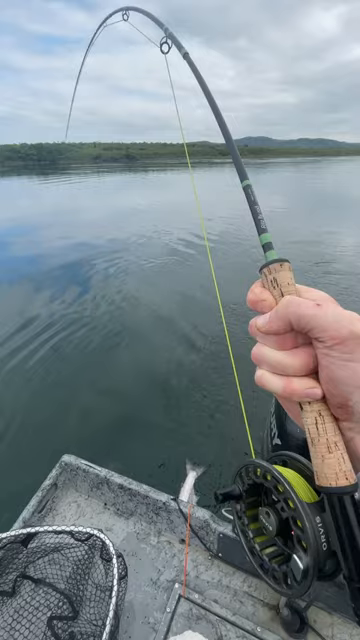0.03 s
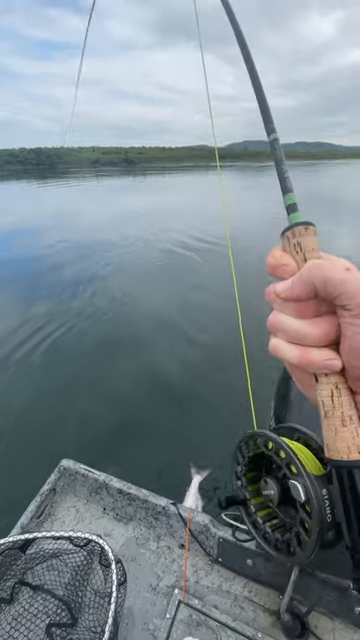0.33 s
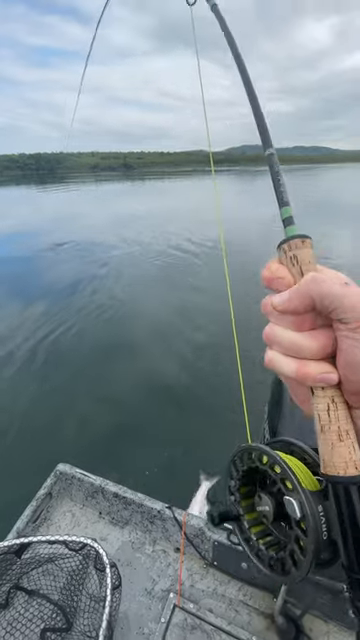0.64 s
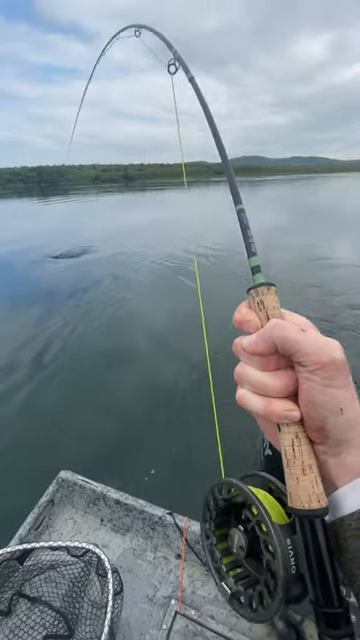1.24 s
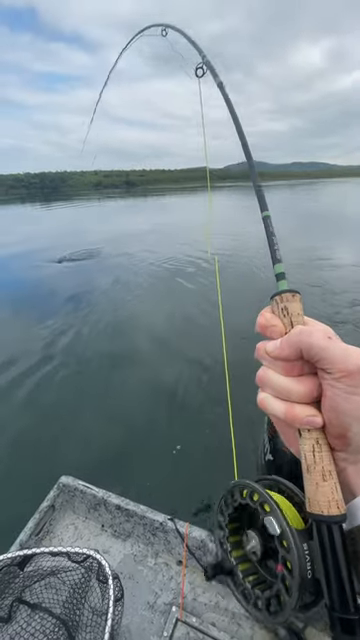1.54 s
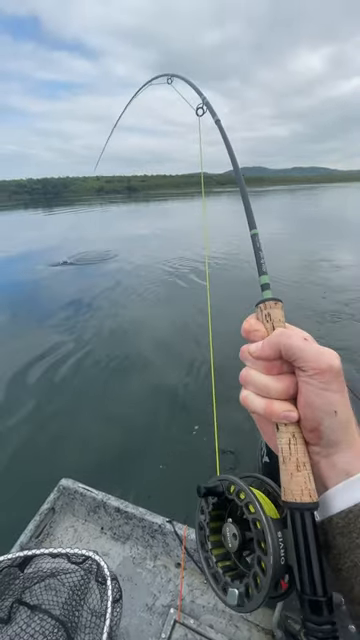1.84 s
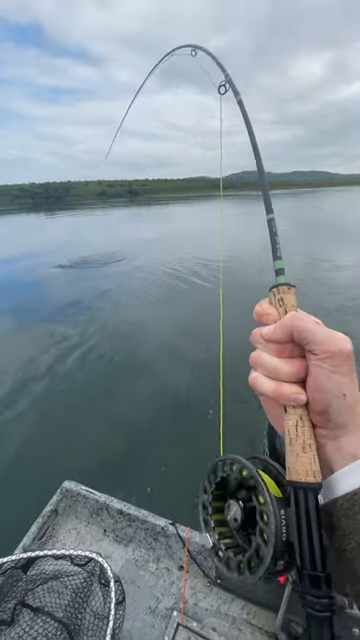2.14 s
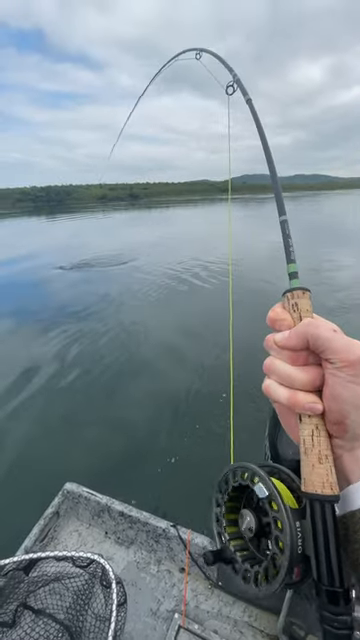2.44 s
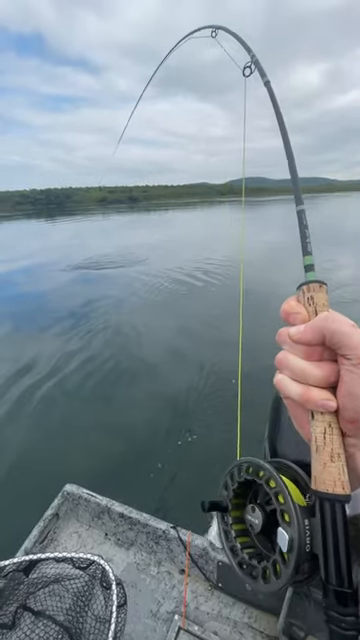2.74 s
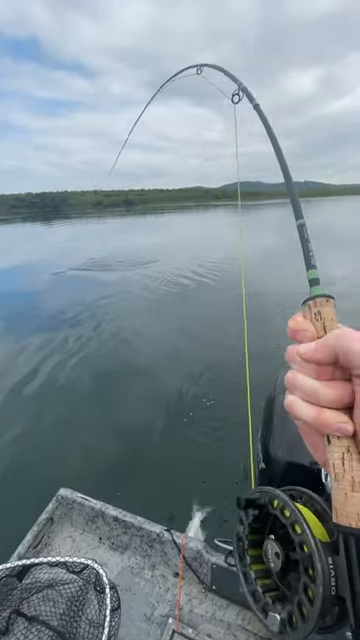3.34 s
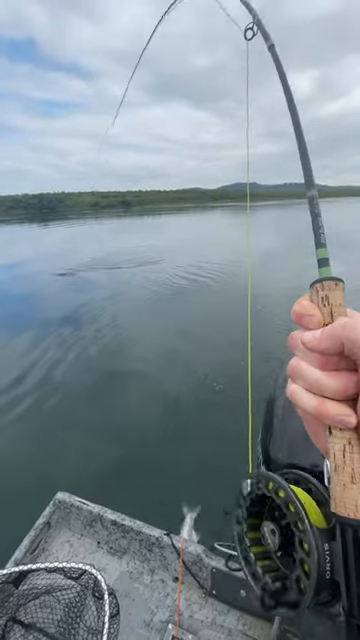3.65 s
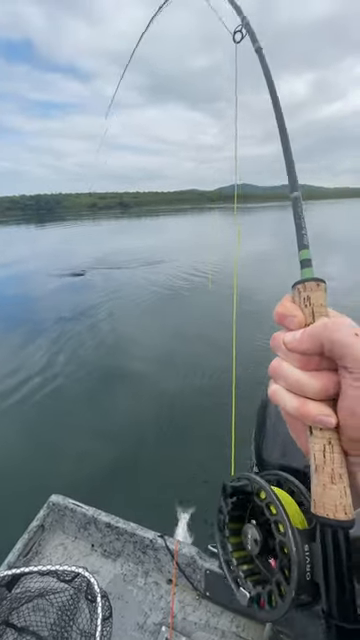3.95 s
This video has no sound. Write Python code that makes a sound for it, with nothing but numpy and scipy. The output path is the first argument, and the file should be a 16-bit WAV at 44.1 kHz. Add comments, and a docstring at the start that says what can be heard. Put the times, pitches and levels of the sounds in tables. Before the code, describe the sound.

A fly reel close by buzzes in four short surges as a fish pulls line, with slow single clicks between them. Behind it, water laps and plops softly at the boat's hull over a faint low hum.

```python
"""A fly reel gives line to a hooked fish in four surges, close by in a boat on a calm lake.
Its pawl snaps over the spool's 22 teeth: single ticks at a creep, a buzz on the run, the ring
changing colour round each turn. Spool and line whirr with the speed; the boat adds short echoes.
Behind it, ripples lap and bubbles plop at the hull over a low hum, probably an electric motor."""
import sys
import numpy as np
from scipy import signal
from scipy.fft import rfft, irfft
from scipy.io import wavfile
from scipy.ndimage import uniform_filter1d

SR = 44100
rng = np.random.default_rng(int(sys.argv[2]) if len(sys.argv) > 2 else 0)


def wrap_up_sound(samples):
    """Save the sound to the file named by the first command line argument, as 16-bit audio."""
    columns = np.atleast_2d(samples).T
    # keep every value between -1 and 1, then stretch to whole-number steps
    tamed = np.clip(columns, -1, 1)
    steps = np.round(tamed * 32767).astype(np.int16)
    wavfile.write(sys.argv[1], SR, steps)


N = 176400
TIME = np.arange(N) / SR

# fader ride of the hum: t/s, level/dB
HUM_RIDE = [(.05, -48), (.16, -58.5), (.25, -67), (.3, -54), (.43, -48.5), (.63, -54), (.85, -43.5),
            (1.6, -38.5), (2.07, -47), (2.5, -43.5), (2.68, -49), (2.82, -44), (3.03, -52.5), (3.38, -45.5),
            (3.57, -59.5), (3.74, -59.5), (4, -47.5)]
# fader rides of the lapping: t/s, splash level/dB, gurgle level/dB
LAPPING_RIDE = [(0, -52.5, -65.5), (.3, -69.5, -84), (.7, -73.5, -78.5), (1.05, -62.5, -72.5),
                (1.45, -60.5, -67), (1.9, -58, -56.5), (2.2, -59.5, -72.5), (2.45, -66, -75.5),
                (2.7, -67, -76), (2.88, -72, -60.5), (3.1, -68.5, -74), (3.4, -59.5, -73),
                (3.6, -63.5, -70), (3.78, -68.5, -60), (4, -64, -62)]
# EQ curves of the water's bright splash, hollow gurgle and low rumble: f/Hz, relative level/dB
SPLASH_EQ = [(200, -36), (600, -6.5), (1000, -3), (2000, -2), (3300, -12), (5500, -11.5), (12000, -25.5),
             (16000, -40)]
GURGLE_EQ = [(100, -4.5), (400, 9.5), (600, -0.5), (1000, 2.5), (3000, -45)]
RUMBLE_EQ = [(20, -20.5), (55, 3.5), (160, -3), (300, -16.5), (1000, -71)]
# plops at the hull: t/s, relative level/dB, f/Hz
PLOP_CUES = [(0.036, -45, 868), (0.294, -50, 2200), (0.343, -48.5, 647), (0.373, -49.5, 1500),
             (0.392, -50.5, 1220), (0.441, -55, 985), (0.456, -62, 2500), (0.513, -61.5, 1720),
             (0.695, -50, 2030), (0.77, -55, 560), (0.912, -56.5, 585), (0.927, -54.5, 1514),
             (0.997, -45, 1453), (1.25, -46, 946), (1.431, -40.5, 1950), (1.525, -44.5, 1975),
             (1.639, -45, 2120), (1.667, -44.5, 1910), (1.812, -40, 2055), (2.235, -48, 1076),
             (2.298, -44, 1006), (2.536, -49, 650), (2.536, -53, 1460), (2.572, -44.5, 895),
             (2.606, -57, 1063), (2.656, -49, 844), (2.66, -55, 1480), (2.922, -53.5, 1146),
             (3.144, -50.5, 897), (3.434, -43, 418), (3.666, -46, 1068), (3.711, -43.5, 1566),
             (3.745, -51, 1050), (3.786, -51, 1080), (3.905, -50, 852)]
# small sharp slaps of water: t/s, level/dB, centre f/Hz
SLAP_CUES = [(0.472, -62, 7200), (0.692, -64, 4770), (0.798, -56, 4870), (2.292, -33, 2260),
             (3.192, -42, 4300)]
# EQ curve of the spool and running line: f/Hz, relative level/dB
WHIRR_EQ = [(200, -30), (1000, -14), (1600, 6.5), (2400, 5), (5500, 5), (8000, -7.5), (12000, -5.5),
            (16000, -59)]
# spool speed, one list for each surge: t/s, speed/(teeth/s)
SURGE_SPEEDS = [
    [(0.0377, 80.7), (0.0925, 102.2), (0.1138, 98.2), (0.1361, 103.4), (0.1606, 96.1), (0.1848, 83.4),
     (0.2578, 28.2)],
    [(1.2177, 31.6), (1.2422, 44.0), (1.33, 47.5), (1.3709, 55.6), (1.4112, 54.2), (1.4902, 24.6),
     (1.5149, 33.7)],
    [(1.7788, 37.8), (1.8293, 49.5), (1.8723, 80.7), (1.9525, 114.5), (1.9983, 112.4), (2.0557, 93.6),
     (2.0956, 82.3), (2.1459, 53.4), (2.28, 24.3)],
    [(3.2919, 56.3), (3.3392, 126.2), (3.3797, 174.8), (3.4884, 208.5), (3.5333, 219.9), (3.5999, 164.1),
     (3.6175, 152.2), (3.6474, 131.0), (3.6782, 92.5), (3.7307, 20.0)],
]
# accent on the ticks of each surge: relative level/dB
SURGE_ACCENTS = [0, 1, 1.2, 1.5]
# single ticks while the spool creeps: t/s, relative level/dB
CREEP_CUES = [(.9106, 2), (.9884, 2), (1.035, 0.5), (1.0768, -1), (1.1118, -0.5), (1.145, 2), (1.1824, 1),
              (1.562, 3), (1.6609, 3), (1.7189, 4.5), (1.7512, 3.5), (2.3179, -1), (2.3676, 0),
              (2.4308, 0.5), (2.4998, 2.5), (2.5882, 2.5), (2.7078, -1), (3.1675, 1), (3.2081, 2.5),
              (3.269, 2.5)]
# resonances of the reel: f/Hz, width/Hz, relative level/dB, level swing/dB, loudest tooth/index,
# swings/(1/turn), pitch swing/Hz
REEL_MODES = [(2500, 1660, -20.5, 2, 8.7, 1, -280), (3830, 790, -11.5, 2, 3.7, 3, 45),
              (5167, 370, -19, 15, 1.25, 1, 87), (6200, 450, -1.5, 1.5, 6.8, 1, 275),
              (6470, 1560, -8.5, 2.5, 18.4, 2, 287), (8390, 750, -7.5, 2.5, 3.7, 2, -180),
              (9340, 3600, -17.5, 4.5, 14.4, 3, 448), (13240, 2000, -23, 7, 21, 1, -190),
              (15260, 700, -16.5, 5, 2.1, 1, 200)]
# stereo image of the reel: f/Hz, phase lead of left over right/rad
REEL_PHASE_LEAD = [(200, 4), (1500, 2.4), (3500, 2.5), (5200, 1), (7000, 4), (9000, 4), (11000, 6),
                   (14300, 10)]

TEETH = 22
BUBBLE_CYCLES = 10  # a bubble's ring falls to 1/e in this many cycles


def amp(db):
    """Decibels to gain."""
    return 10 ** (np.asarray(db) / 20)


def unit_rms(x):
    """Scales to rms 1."""
    return x / np.sqrt(np.mean(x ** 2) + 1e-20)


def ride(rows, column=1):
    """A fader ride: one column of a table, joined by straight lines in time."""
    rows = np.array(rows)
    return np.interp(TIME, rows[:, 0], rows[:, column])


def add(mix, start_s, sound):
    """Drops a sound into the mix at its cue."""
    part = mix[..., max(round(start_s * SR), 0):][..., :sound.shape[-1]]
    part += sound[..., :part.shape[-1]]


def noise(eq, correlation):
    """Stereo noise of rms 1 through an EQ curve; low correlation makes it wide."""
    hz, db = np.transpose(eq)
    left, other = rng.standard_normal((2, N))
    right = correlation * left + np.sqrt(1 - correlation ** 2) * other
    colour = amp(np.interp(np.log(np.fft.rfftfreq(N, 1 / SR) + 1), np.log(hz), db))
    return unit_rms(irfft(rfft([left, right]) * colour, N))


def drift(hz):
    """A random modulator of rms 1, rolled off above hz."""
    lowpass = np.exp(-(np.fft.rfftfreq(N, 1 / SR) / hz) ** 2)
    return unit_rms(irfft(rfft(rng.standard_normal(N)) * lowpass, N))


def hum(hz=110.45, waver=0.0034, octave_db=-22, left_lag_rad=0.076):
    """The low bed, probably an electric motor: a slightly wavering note with a weak octave."""
    pitch = hz * (1 + waver * drift(hz=6.3))
    phase = 2 * np.pi * np.cumsum(pitch) / SR - np.array([[left_lag_rad], [0]])
    octave = amp(octave_db + 2 * drift(hz=10)) * np.sin(2 * phase)
    return amp(ride(HUM_RIDE)) * (np.sin(phase) + octave)


def lapping(ripple_db=2.2, spatter_db=3.5, correlation=0.057):
    """Ripples wash the hull: an uneven, spattering splash over a gurgle and a steady rumble."""
    splash = noise(SPLASH_EQ, correlation)
    splash *= amp(ride(LAPPING_RIDE) + ripple_db * drift(hz=43) + spatter_db * (drift(hz=398) - 0.5))
    gurgle = noise(GURGLE_EQ, correlation) * amp(ride(LAPPING_RIDE, column=2) + 2.7 * drift(hz=9.7))
    rumble = amp(-67.5) * noise(RUMBLE_EQ, correlation=0.38)
    return splash + gurgle + rumble


def bubble(db, hz, pinch_cycles=3, pinch_drop=.35, rise=.04):
    """A bubble pinches off with a quick drop in pitch, then rings and rises slowly; panned at random."""
    decay_s, pinch_s = BUBBLE_CYCLES / hz, pinch_cycles / hz
    t = TIME[:int(6 * decay_s * SR)]
    pan, lag = rng.standard_normal(2)
    sides = np.array([[1], [-1]])
    pinch = np.exp(-t / pinch_s)
    pitch = hz * (1 + pinch_drop * pinch + rise * (t / decay_s - 1))
    phase = 2 * np.pi * np.cumsum(pitch) / SR + .5 * lag * sides
    envelope = (1 - pinch) * np.exp(-t / decay_s)
    return amp(db + 1.1 * pan * sides) * envelope * np.sin(phase)


def small_bubbles(per_s=90, centre_hz=1442.4, spread_octaves=.5, boost_db=7, spread_db=3.5):
    """Clusters of small bubbles, their level riding with the splash."""
    out, level_db = np.zeros((2, N)), ride(LAPPING_RIDE) + boost_db
    starts = np.flatnonzero(rng.random(N) < per_s / SR * np.exp(drift(hz=8)))
    variations = np.clip(rng.standard_normal((N // 100, 2)), -2, 2)
    for i, (strength, pitch) in zip(starts, variations):
        hz = centre_hz * 2 ** (spread_octaves * pitch)
        add(out, i / SR, bubble(level_db[i] + spread_db * strength, hz))
    return out


def splash_burst(hz, octaves, decay_s, attack_s=0.00048):
    """A short splash: a band of noise round one pitch, with a hard attack."""
    t = TIME[:int(6 * decay_s * SR) + 2]
    f = np.fft.rfftfreq(len(t), 1 / SR) + 1
    band = np.exp(-.5 * (np.log2(f / hz) / octaves) ** 2)
    mid, side = irfft(rfft(rng.standard_normal((2, len(t)))) * band, len(t))
    envelope = (1 - np.exp(-t / attack_s)) * np.exp(-t / decay_s)
    return unit_rms(np.array([mid + .5 * side, mid - .5 * side])) * envelope


def plops_and_slaps():
    """Water hits the hull: a plop is a bubble in a softer splash, a slap is a sharp splash alone."""
    out = np.zeros((2, N))
    for s, db, hz in PLOP_CUES:
        add(out, s, bubble(db + 4.5, hz))
        add(out, s, amp(db - 8) * splash_burst(hz, octaves=0.31, decay_s=BUBBLE_CYCLES / hz))
    for s, db, hz in SLAP_CUES:
        add(out, s, amp(db) * splash_burst(hz, octaves=0.63, decay_s=0.0031))
    return out


def scatter(x, t60_s):
    """Diffuse echoes in the sound's own colour, never twice alike as the reel moves in the hand."""
    colour = np.sqrt(abs(uniform_filter1d(abs(rfft(x)) ** 2, size=801)))
    hiss = unit_rms(irfft(rfft(rng.standard_normal((2, N))) * colour, N))
    feedback = amp(-60 / (t60_s * SR)) ** 2
    tail_power = signal.lfilter([1 - feedback], [1, -feedback], x ** 2)
    return hiss * np.sqrt(tail_power)


def spool_speed(surge):
    """Teeth per second through one surge, zero outside it."""
    return np.interp(TIME, *np.transpose(surge), left=0, right=0)


def whirr(db_at_100_teeth_per_s=-52, db_per_decade=24.5):
    """The airy noise of spool and running line, swelling with the speed."""
    speed = abs(uniform_filter1d(sum(spool_speed(surge) for surge in SURGE_SPEEDS), size=600))
    level_db = db_at_100_teeth_per_s + db_per_decade * np.log10(speed / 100 + 1e-6)
    return noise(WHIRR_EQ, correlation=0) * amp(level_db)


def reel_ring(tooth, thud_db=-52, size=1024):
    """The reel's ring when struck at one tooth: each mode's level and pitch swing as the spool turns."""
    hz = abs(np.fft.fftfreq(size, 1 / SR))
    power = amp(thud_db) ** 2 * hz ** 2 / (hz ** 2 + 500 ** 2) + 1e-8
    for mode_hz, width_hz, db, swing_db, loudest_tooth, swings, swing_hz in REEL_MODES:
        angle = 2 * np.pi * round(swings) * (tooth - loudest_tooth) / TEETH
        level = amp(db + swing_db * np.cos(angle))
        detune = (hz - mode_hz - swing_hz * np.sin(angle)) / (0.58 * width_hz)
        power += (level / (1 + detune ** 2)) ** 2
    log_spectrum = np.conj(signal.hilbert(np.log(power) / 2))  # minimum phase keeps the attack crisp
    return np.fft.ifft(np.exp(log_spectrum)).real


def tick_cues():
    """Every tick in order, creeping or running, one for each passing tooth: t/s, relative level/dB."""
    cues = list(CREEP_CUES)
    for surge, db in zip(SURGE_SPEEDS, SURGE_ACCENTS):
        teeth_passed = np.ceil(np.cumsum(spool_speed(surge)) / SR)
        cues += [(s, db) for s in TIME[1:][np.diff(teeth_passed) > 0]]
    return sorted(cues)


def pawl(trim_db=-1, spread_db=1.1, scrape_s=.0004, rattle_s=.0005, rattle_db=-6, touch_db=-24):
    """The pawl touches each tooth faintly, scrapes up it, snaps over and rattles, ringing the reel."""
    rings = [reel_ring(tooth) for tooth in range(TEETH)]
    out, previous_s = np.zeros(N), 0
    t = np.arange(-200, 200) / SR  # the snap sits at t = 0
    envelope = np.exp(np.minimum(t / scrape_s, -t / rattle_s))
    for k, (s, db) in enumerate(tick_cues()):
        rattle = envelope * rng.standard_normal(len(t)) * (t != 0)
        force = (t == 0) + amp(rattle_db) * rattle / np.linalg.norm(rattle)
        gain = amp(trim_db + db + spread_db * rng.standard_normal())
        tick = gain * np.convolve(force, rings[k % TEETH])
        start_s = s + t[0] - .0001  # the snap lands a hair ahead of its cue
        touch_lead_s = min(.3 * (s - previous_s), .01)
        add(out, start_s, tick)
        add(out, start_s - touch_lead_s, amp(touch_db) * tick)
        previous_s = s
    return out


def reel(boat_cutoff_hz=3800, deck_delay_s=.0085):
    """The ticks up front in stereo, with scatter off spool and hand, a dull boat tail and a deck echo."""
    ticks, hz = pawl(), np.fft.rfftfreq(N, 1 / SR)
    lead = np.interp(hz, *np.transpose(REEL_PHASE_LEAD))
    direct = irfft(rfft(ticks) * np.exp(.5j * np.array([lead, -lead])), N)
    dull = irfft(rfft(ticks) / (1 + (hz / boat_cutoff_hz) ** 2), N)
    close_scatter = amp(-13) * scatter(ticks, t60_s=0.019)
    boat_tail = amp(-15) * scatter(dull, t60_s=0.15)
    out = direct + close_scatter + boat_tail
    add(out, deck_delay_s, amp(-24) * direct)
    return out


def scene():
    """The reel and its whirr over a bed of hum and water."""
    return reel() + whirr() + hum() + lapping() + small_bubbles() + plops_and_slaps()


def record(dry):
    """The master: a moment of silence, a fast fade-in and a steep high cut."""
    silence_s, fade_s, cutoff_hz = 0.034, 0.0039, 16800
    faded = dry * np.clip((TIME - silence_s) / fade_s, 0, 1)
    high_cut = signal.firwin(255, cutoff_hz, window=("kaiser", 8), fs=SR)
    return signal.oaconvolve(faded, high_cut[None], "same")


dry = scene()
out = record(dry)
wrap_up_sound(out)
```